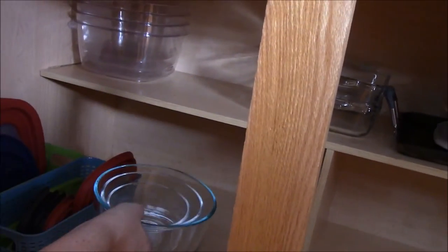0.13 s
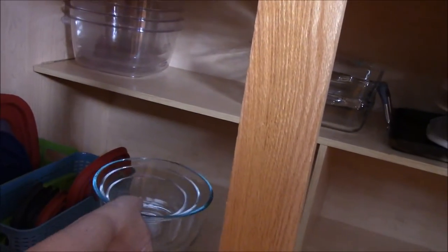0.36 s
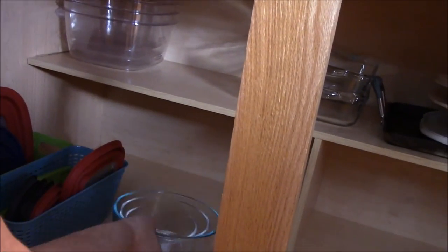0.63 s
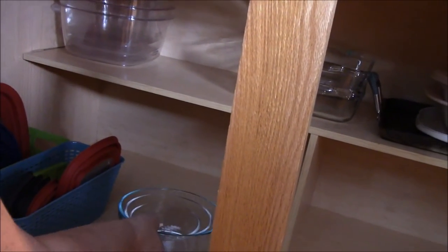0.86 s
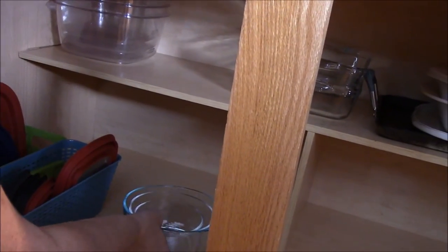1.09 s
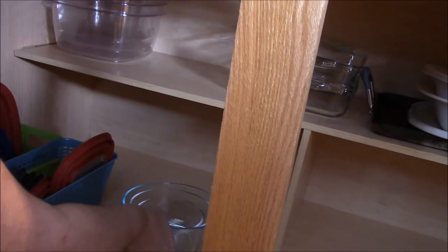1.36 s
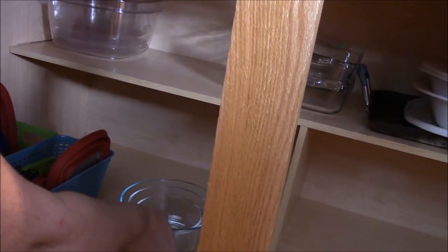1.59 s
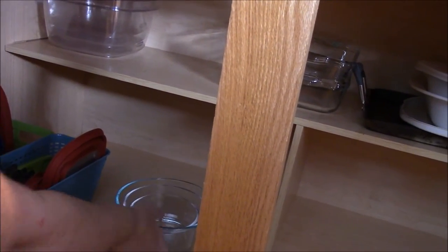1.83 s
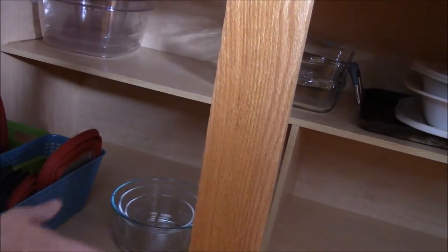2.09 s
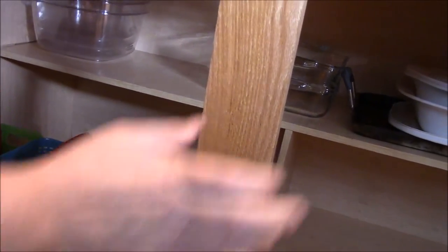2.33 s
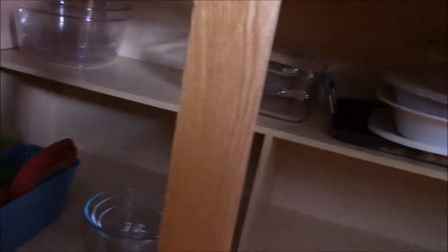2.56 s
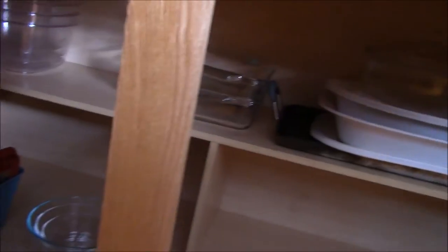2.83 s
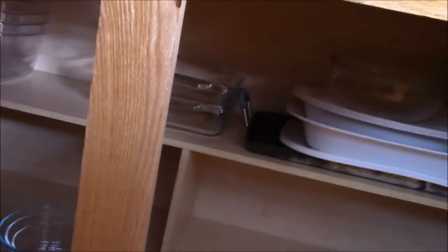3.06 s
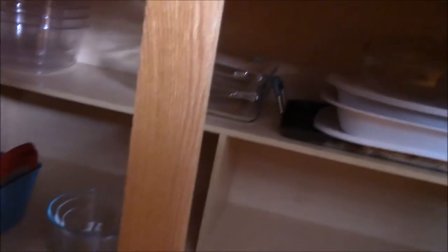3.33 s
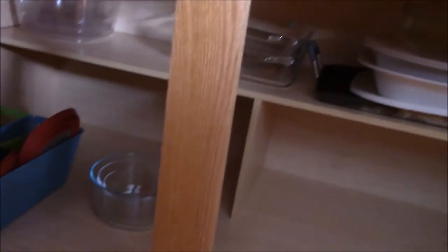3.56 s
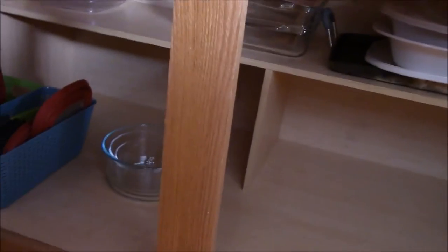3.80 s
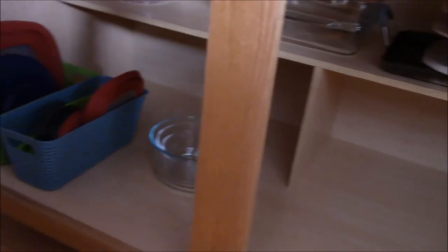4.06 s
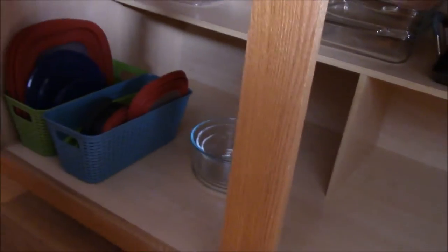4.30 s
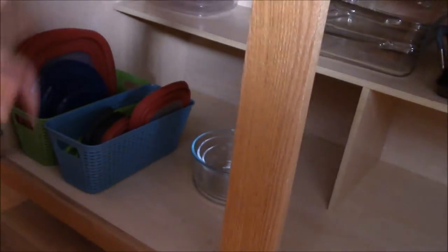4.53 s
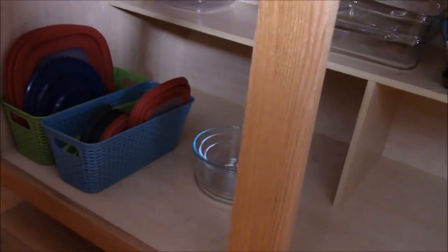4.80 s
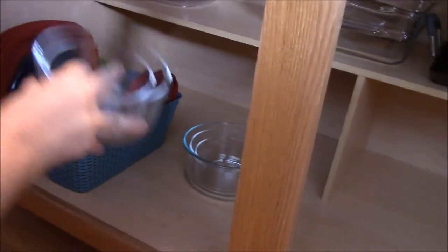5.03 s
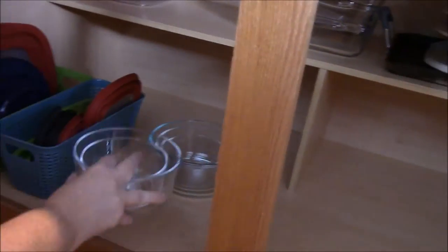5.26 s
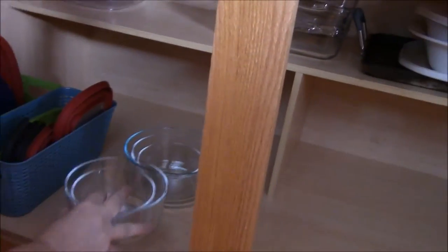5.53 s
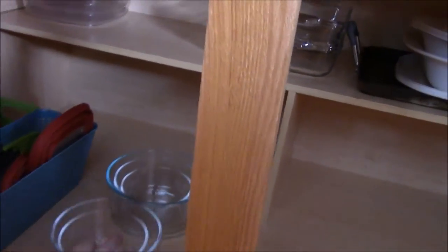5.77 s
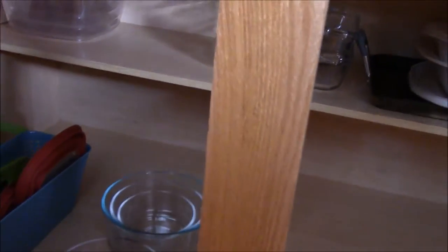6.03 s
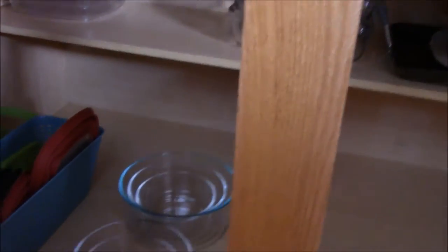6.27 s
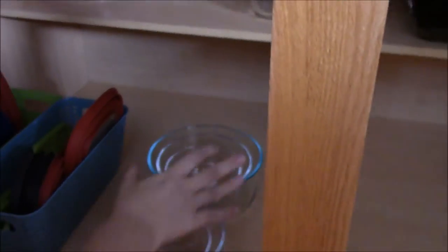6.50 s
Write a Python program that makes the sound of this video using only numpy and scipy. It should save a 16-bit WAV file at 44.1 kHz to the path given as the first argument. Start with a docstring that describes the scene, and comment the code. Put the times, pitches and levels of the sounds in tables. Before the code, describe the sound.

Faint room murmur and soft skin and cloth rustle surround glass bowls handled inside a wooden cupboard. A firm woody thunk comes first, then lighter knocks and nail ticks. A glassy clink starts a short, uneven drag across the shelf, ending in a bump. After a lull, a crisp tick precedes the strongest landing, sharp and glassy with a brief boxy ring. Close microphone, nearly mono, small dry room.

```python
"""Nested glass bowls are set down, pushed and dragged on a wooden cabinet shelf in a quiet kitchen.
Each landing excites decaying modes of the shelf; clinks and jolts ring the bowls' own modes, and heavy
blows make the cabinet boom. The drag is a dense train of stick-slip grains driving shelf and glass.
Sleeves and hands rustle as filtered noise over a murmur of air; a faint, thin tone near 5.6 kHz flickers.
Two close microphones hear nearly the same: a strong mid signal and a weak side signal."""
import sys
import numpy as np
from scipy import signal
from scipy.fft import rfft, irfft
from scipy.io import wavfile
from scipy.ndimage import map_coordinates

SR = 44100
rng = np.random.default_rng(int(sys.argv[2]) if len(sys.argv) > 2 else 0)


def elevation(decibels):
    """Turn decibel levels (scalar or array-like) into linear amplitude ratios."""
    levels = np.asarray(decibels, float)
    return 10 ** (levels / 20)


def generate_wav(sig):
    """Save sig (samples, or channels by samples) to the path in sys.argv[1] as 16-bit PCM at SR."""
    pcm = np.round(np.clip(np.atleast_2d(sig).T, -1, 1) * 32767).astype(np.int16)
    wavfile.write(sys.argv[1], SR, pcm)


N = 292383   # length in samples

# Cloth and skin, before and after the drag: t/s, level/dB of 2.5-8 kHz, level/dB of 8-15.5 kHz
RUSTLE_LEVELS = [
    [(0.0, -71, -85), (0.63, -75.5, -83.5), (1.14, -72.5, -84), (1.76, -73, -87), (2.15, -63.5, -81),
     (2.5, -68, -82.5), (2.65, -66, -78), (2.84, -61.5, -84), (3.0, -67.5, -74), (3.28, -67, -68),
     (3.54, -66.5, -74)],
    [(4.55, -68, -79), (5.11, -68, -76.5), (5.32, -61, -71), (5.56, -67.5, -74), (5.74, -71, -76),
     (6.04, -71.5, -82), (6.18, -63.5, -76), (6.41, -71, -75), (6.63, -70.5, -85)],
]
# Spectral shape of the room's air: f/Hz, relative level/dB per Hz
AIR_SPECTRUM = [(24, -43), (40, -10), (96, -15), (140, -13), (171, -7.5), (209, -3.5), (371, -5),
                (431, -10), (596, -11), (1010, -18.5), (1200, -37), (3190, -40), (5670, -33.5), (6110, -59),
                (15800, -59)]
# Course of the thin tone, about which it flickers: t/s, level/dB
THIN_TONE_LEVELS = [(0, -89), (1.25, -86), (1.38, -74), (1.55, -91), (1.8, -76), (2.0, -86.5), (6.63, -85)]
# Glass landing on the shelf: t/s, relative level/dB at 650 Hz, tilt/(dB per octave),
# fall-off to both sides/(dB per octave squared)
LANDINGS = [(1.006, -16, -2.5, 3.5), (1.011, -22.5, -3, 1), (1.014, -22.5, -2, 4), (1.224, -57, 3.5, -0.2),
            (1.251, -53, 3.5, 2.5), (1.567, -30.5, 0, -0.7), (1.577, -31, -4.5, -1),
            (1.593, -31.5, -6.5, 1.5), (1.665, -45, -1, -0.3), (1.836, -50, 3, 10), (1.845, -44, 1, 7),
            (1.858, -27.5, 2, 12), (1.867, -34, -1, 3), (1.952, -44.5, 4, 4.5), (2.39, -53.5, -1.5, 1.5),
            (2.958, -45, 4, 2.5), (3.234, -38.5, 4.5, 7), (3.555, -39.5, 18, 6.5), (4.202, -25, 0.5, 2.5),
            (4.228, -27.5, 1, 2.5), (5.252, -40.5, 0.5, 3.5), (6.009, -11, 0, 6.5),
            (6.012, -17.5, 0.5, 2.5), (6.04, -23, 0, 2.5), (6.053, -24.5, -2.5, 3.5),
            (6.136, -40, 9.5, 6.5), (6.31, -41.5, 0, 5), (6.397, -59, -7, -0.3)]
# Modes of the shelf: f/Hz, relative level/dB, t60/s
SHELF_MODES = [(190.4, 9.5, 0.087), (224.5, 4.5, 0.19), (254.4, 1, 0.28), (345, 0, 0.17), (395, 2, 0.24),
               (430, -11, 0.12), (448.4, -3, 0.19), (599, 3.5, 0.11), (638, -3.5, 0.18), (727, 2.5, 0.13),
               (905.5, 5.5, 0.083), (1044, -2, 0.12), (1133, 3, 0.05), (1306, -1, 0.11), (1490, 0.5, 0.13),
               (1547, -2.5, 0.15), (1780, -15, 0.076), (1800, 0, 0.099), (1980, -6, 0.087),
               (2053, 3.5, 0.081), (2252, 6.5, 0.069), (2300, -4, 0.11), (2470, -3, 0.078),
               (2665, -15, 0.12)]
# Centres of the frequency zones in which a landing is weighted: f/Hz
SHELF_ZONES = [215, 390, 650, 1170, 2200]
# Glass clinks, and jolts of the dragged bowl that sound its base tones: t/s, relative level/dB,
# share of the wide bowl (0-1), base tones' level/dB, crack's relative level/dB
CLINKS_AND_JOLTS = [(1.0104, -40.5, 0.07, -28, -35), (1.2234, -63.5, 0.6, -69, -56.5),
                    (1.239, -58, 0.6, -54, -45), (1.568, -42.5, 0.65, -50, -35),
                    (1.5848, -48, 0, -45, -34.5), (1.6636, -55.5, 0.65, -65, -50),
                    (1.8635, -61, 0, -35.5, -52), (3.5564, -30.5, 0.8, -22.5, -38),
                    (3.607, -40, 0.55, -29.5, -58), (3.6993, -56, 0.7, -31.5, -62),
                    (3.8003, -41.5, 0.46, -30, -40), (3.8392, -51.5, 0.2, -33.5, -46),
                    (4.032, -47.5, 0.2, -30.5, -63), (4.09, -69, 0.3, -37, -66),
                    (4.2038, -49, 0.1, -26, -60), (4.2194, -47, 0.1, -27.5, -60),
                    (4.2903, -66, 0.2, -38, -50), (5.4019, -50, 0.15, -32.5, -43.5),
                    (6.0132, -21.5, 0, -17, -24.5), (6.0301, -50, 0.3, -22, -28),
                    (6.0416, -39, 0.13, -40, -39), (6.137, -49.5, 0.22, -33.5, -50),
                    (6.2857, -55.5, 0.32, -31.5, -53)]
# Modes of the small bowl: f/Hz, relative level/dB, t60/s
SMALL_BOWL_MODES = [(2676, -8.5, 0.16), (3828, -7, 0.22), (3850, -5.5, 0.079), (4710, -28, 0.033),
                    (5560, -14.5, 0.066), (5819, -24, 0.088), (6400, -20, 0.15), (6500, -5, 0.068),
                    (6700, -22, 0.089), (8900, -19, 0.067), (9250, -26, 0.059), (11930, -29, 0.067)]
# Modes of the wide bowl: f/Hz, relative level/dB, t60/s
WIDE_BOWL_MODES = [(1965, -13, 0.25), (2340, -6, 0.34), (3020, -14.5, .15), (3298, -6.5, 0.23),
                   (3290, 1.5, 0.096), (4004, 0.5, 0.18), (5690, -14, 0.27), (5900, -19, .2),
                   (9020, -26, 0.17)]
# Modes of the bowl bottoms: f/Hz, relative level/dB, t60/s
BASE_MODES = [(906, -11, 0.098), (1066, -1, 0.053), (1193.6, 0, 0.076), (1225, -9, 0.11), (1293, -2, 0.035),
              (1534, -8.5, 0.1), (1800, -11.5, 0.06)]
# Blows that make the cabinet boom: t/s, level/dB
BOOMS = [(1.012, -26.5), (1.335, -48), (1.583, -28.5), (1.869, -48), (3.699, -57), (3.799, -62.5),
         (4.049, -53), (4.209, -46.5), (4.377, -52.5), (6.015, -28), (6.292, -50)]
# Modes of the cabinet: f/Hz, relative level/dB, t60/s
CABINET_MODES = [(110.9, -5.5, 0.23), (127.6, 0.5, 0.19)]
# Reverberation of the kitchen: f/Hz, t60/s
KITCHEN_DECAY = [(100, 0.63), (400, 0.63), (1500, 0.53), (5000, 0.25), (12000, 0.61)]
# Fingernail and rim ticks: t/s, level/dB, f/Hz of the first ring, f/Hz of the second,
# level/dB of the second against the first
TICKS = [(1.774, -42, 4800, 3020, -3), (1.903, -51, 3200, 2600, -2), (2.254, -53.5, 10000, 7000, 3),
         (2.391, -40, 3020, 2300, -7), (3.235, -45.5, 5430, 1800, 10), (4.317, -40, 4700, 6900, -10),
         (5.250, -40, 5260, 1630, 5), (5.259, -39, 5050, 3740, -3.5), (5.417, -58, 7500, 3900, 6),
         (5.631, -48, 3020, 2200, 3), (5.767, -29, 4140, 2460, 0.5), (5.771, -32.5, 1490, 2740, 0)]
# The drag, four shoves: t/s, level/dB of the middle band, level/dB of the low band against it
DRAG_LEVELS = [(3.56, -38, -15), (3.664, -33.5, -6), (3.738, -36.5, -7.5), (3.79, -25.5, -2),
               (3.868, -32.5, -4), (3.906, -43, 1), (4.016, -29.5, -6), (4.142, -40.5, -7.5),
               (4.2, -35, 1.5), (4.284, -42.5, 5), (4.394, -50, 10), (4.6, -70, -25)]
# Resonances that sing under the drag: f/Hz, bandwidth/Hz, relative level/dB
RUB_RESONANCES = [(390, 13, -30), (492, 20, -3), (905.5, 11, 3.5), (1000, 38, 0.5), (1176, 28, 3),
                  (1298, 14, -3.5), (1733, 210, 1.5), (2190, 180, 4.5), (2453, 43, 0), (2750, 36, -22),
                  (3036, 21, -12.5)]
# Gain of the side signal: f/Hz, level/dB
SIDE_GAIN = [(60, -17), (150, -24.5), (380, -19.5), (950, -16), (2380, -16), (5980, -18), (15000, -17)]


def rms_one(x):
    """Normalization: division by the root mean square gives unit power."""
    return x / np.sqrt(np.mean(x ** 2) + 1e-20)


def in_time(rows):
    """Linear interpolation: each column becomes a piecewise straight curve in time."""
    times, *columns = np.transpose(rows)
    return [np.interp(np.arange(N) / SR, times, column) for column in columns]


def at_hz(points, hz):
    """Interpolation on a logarithmic frequency axis."""
    table_hz, values = np.array(points)[:, :2].T
    return np.interp(np.log(hz), np.log(table_hz), values)


def band(x, low_hz, high_hz, order=2):
    """Band limitation by a Butterworth filter."""
    edges = [low_hz, min(high_hz, .45 * SR)]
    return signal.sosfilt(signal.butter(order, edges, "band", fs=SR, output="sos"), x)


def drift(rate):
    """Slow random modulation: a spline through `rate` normal deviates a second, spread about 1."""
    steps = rng.standard_normal(int(N / SR * rate) + 3)
    return map_coordinates(steps, [np.arange(N) / SR * rate], order=3)


def ring(x, hz, t60):
    """Damped resonance: a unit click sets a decaying sine of height 1 ringing."""
    radius = 1000 ** (-1 / (t60 * SR))
    angle = 2 * np.pi * hz / SR
    return signal.lfilter([0, np.sin(angle)], [1, -2 * radius * np.cos(angle), radius ** 2], x + 1e-18)


def soft_ring(x, hz, t60, cycles):
    """Finite contact time: a contact of a few cycles makes the mode swell in instead of clicking."""
    contact_t60 = cycles / hz
    scale = 2 * (1 - 1000 ** (-1 / (contact_t60 * SR)))
    return ring(ring(x, hz, contact_t60), hz, t60) * scale


def strike(rows, gains):
    """Impulsive excitation: one click of the given gain at the time of each row."""
    clicks = np.zeros(N)
    np.add.at(clicks, (np.array(rows)[:, 0] * SR).astype(int), gains)
    return clicks


def dying_noise(rows, gains, t60):
    """High modal density: unresolved modes act as noise that starts at each row and decays."""
    radius = 1000 ** (-1 / (t60 * SR))
    envelope = signal.lfilter([1], [1, -radius], strike(rows, gains) + 1e-18)
    return envelope * rng.standard_normal(N)


def rustle(patchy_db=0.88, soft_mean_db=-64.5, soft_follows=0.88):
    """Friction noise of cloth and skin: three bands of slightly patchy noise, in mid and side."""
    middle, crisp = in_time(np.vstack(RUSTLE_LEVELS))
    soft = soft_mean_db + soft_follows * (middle - middle.mean())   # follows a share of the swing
    out = 0
    for level_db, low_hz, high_hz in ((soft, 600, 2500), (middle, 2500, 8000), (crisp, 8000, 15500)):
        noise = rms_one(band(rng.standard_normal((2, N)), low_hz, high_hz))
        out = out + elevation(level_db + patchy_db * drift(14.0)) * noise
    return out


def air(murmur_db=-60.0):
    """Stationary noise: spectral shaping of random noise gives a steady murmur in mid and side."""
    hz = np.maximum(np.fft.rfftfreq(N, 1 / SR), 10)
    murmur = irfft(rfft(rng.standard_normal((2, N))) * elevation(at_hz(AIR_SPECTRUM, hz)), N)
    return elevation(murmur_db) * rms_one(murmur)


def thin_tone(hz=5570, flicker_db=3.3):
    """Amplitude modulation: a faint sine, in mid only, flickers at random in level."""
    level = elevation(in_time(THIN_TONE_LEVELS)[0] + flicker_db * drift(7.9))
    tone = level * np.sin(2 * np.pi * hz * np.arange(N) / SR)
    return tone * [[1], [0]]


def landings(level_db=-12.0, scatter_db=2.5, body_db=-7.0, body_cycles=11.0, body_t60=0.073):
    """Modal excitation: each landing rings the shelf modes by zone, and dense modes as dying noise."""
    rows, shelf, zones_hz = np.array(LANDINGS), np.array(SHELF_MODES), np.array(SHELF_ZONES)
    octaves = np.log2(zones_hz / zones_hz[2])
    zones_db = rows[:, [1]] + rows[:, [2]] * octaves - rows[:, [3]] * octaves ** 2
    zone_of = np.argmin(abs(np.log(shelf[:, [0]] / zones_hz)), axis=1)   # nearest zone of each mode
    luck = rng.standard_normal((len(rows), len(shelf)))
    signs = rng.choice([-1, 1], (len(rows), len(shelf)))
    out = np.zeros(N)
    for k, (hz, mode_db, t60) in enumerate(shelf):
        strength = elevation(zones_db[:, zone_of[k]] + mode_db + level_db + scatter_db * luck[:, k])
        out += soft_ring(strike(rows, strength * signs[:, k]), hz, t60, cycles=4.1)
    for k, hz in enumerate(zones_hz):
        zone_t60 = body_t60 + body_cycles / hz   # lows last longer
        dense = dying_noise(rows, elevation(zones_db[:, k] + body_db), zone_t60)
        out += band(dense, hz / 1.225, hz * 1.433) * np.sqrt(SR / hz / 2)
    return out


def bowls(rubbing, scatter_db=2.0, cycles=17.0, held_ring=0.39, rub_tilt_db=9.0, rub_flicker_db=3.8):
    """Modal ringing and damping: clinks, jolts and rubbing excite glass; a holding hand shortens it."""
    let_go_s = 2.2   # until then a hand holds the stack
    held_tilt_db = 8.5   # colour of a hit in the hand, dB per octave about 3800 Hz
    rows = np.array(CLINKS_AND_JOLTS)
    times, wide = rows[:, 0], np.clip(rows[:, 2], 0, 1)
    held = np.arange(N) < let_go_s * SR
    # the crack: too many modes to tell apart
    out = band(dying_noise(rows, elevation(rows[:, 4] - 7.0), 0.053), 2700, 8700)
    # modes, share of each hit, level/dB of the rubbing, tilt when free/(dB per octave)
    small_bowl = (SMALL_BOWL_MODES, 1 - wide, -32, 1.5)
    wide_bowl = (WIDE_BOWL_MODES, wide, -30, -4)
    for modes, share, rubbed_db, free_tilt_db in (small_bowl, wide_bowl):
        tilt_db = np.where(times < let_go_s, held_tilt_db, free_tilt_db)
        luck = rng.standard_normal((len(rows), len(modes)))
        for k, (hz, mode_db, t60) in enumerate(modes):
            octaves = np.log2(hz / 3800)
            hit_db = rows[:, 1] + tilt_db * octaves + scatter_db * luck[:, k]
            hits = strike(rows, share * elevation(hit_db))
            # the rubbed ring comes and goes
            rub_db = rubbed_db + rub_tilt_db * octaves + rub_flicker_db * drift(18.0)
            hits += elevation(rub_db) * rubbing
            free_sound = soft_ring(hits * ~held, hz, t60, cycles)
            held_sound = soft_ring(hits * held, hz, held_ring * t60, cycles)
            out += elevation(mode_db) * (free_sound + held_sound)
    for hz, mode_db, t60 in BASE_MODES:
        hits = strike(rows, elevation(rows[:, 3] + mode_db))
        out += soft_ring(hits * ~held, hz, t60, 9.9)
        out += soft_ring(hits * held, hz, held_ring * t60, 4.0)
    return out


def booms():
    """Low-order modes: the whole cabinet answers heavy blows with two low, slow-starting tones."""
    blows = strike(BOOMS, elevation(np.array(BOOMS)[:, 1]))
    return sum(elevation(mode_db) * soft_ring(blows, hz, t60, cycles=2.7) for hz, mode_db, t60 in CABINET_MODES)


def kitchen(x, gap_s=0.013):
    """Diffuse reverberation: two uncorrelated tails, each octave decaying at its own rate."""
    t, tails = np.arange(SR) / SR, 0
    for hz in 90 * 2 ** np.arange(8):
        noise = band(rng.standard_normal((2, SR)), hz / np.sqrt(2), hz * np.sqrt(2))
        decay = 1000 ** (-t / at_hz(KITCHEN_DECAY, hz))
        tails = tails + noise * decay * (t > gap_s)
    tails /= np.sqrt(np.sum(tails ** 2, axis=1, keepdims=True))   # unit energy
    return signal.fftconvolve(x[None], tails, axes=1)[:, :N]


def ticks(t60=0.0068, snap_db=-13.5, snap_t60=0.0045):
    """Heavily damped resonance: two very short rings over a broadband snap."""
    rows = np.array(TICKS)
    out = band(dying_noise(rows, elevation(rows[:, 1] + snap_db), snap_t60), 1500, 7800)
    click = signal.unit_impulse(1500)
    for s, level_db, hz, other_hz, other_db in TICKS:
        first = soft_ring(click, hz, t60, 2.9)
        second = elevation(other_db) * soft_ring(click, other_hz, t60, 10.0)
        at = int(s * SR)
        out[at:at + len(click)] += elevation(level_db) * (first + second)
    return out


def drag(per_s=2500.0, size_db=2.0, judder_db=2.5, sing_db=6.0, shift_db=3.5):
    """Stick-slip friction: grains drive wandering resonances; returns shelf sound and push on glass."""
    # level/dB against the middle band, and share of its swing that each follows
    bright_mean_db, bright_follows = -10, 1
    glass_mean_db, glass_follows = -31, 0.53
    level_db, weight_db = in_time(DRAG_LEVELS)
    swing_db = level_db - np.mean(DRAG_LEVELS, axis=0)[1]
    bright_db = bright_mean_db + (bright_follows - 1) * swing_db
    glass_db = glass_mean_db + (glass_follows - 1) * swing_db
    t = np.arange(N) / SR
    moving = (t > DRAG_LEVELS[0][0]) & (t < DRAG_LEVELS[-1][0])
    sizes = elevation(size_db * np.minimum(rng.exponential(1, N), 5)) * rng.choice([-1, 1], N)
    slips = rng.random(N) < per_s / SR
    grains = rms_one(sizes * slips) * elevation(judder_db * drift(35.0))
    sung = np.zeros(N)
    for hz, width, db in RUB_RESONANCES:
        favoured = grains * elevation(shift_db * drift(9.0))   # now one resonance, now another
        t60 = np.log(1000) / np.pi / width
        sung += elevation(db) * ring(favoured, hz, t60) * np.sqrt(width)
    rubbed = elevation(sing_db) * rms_one(sung) + rms_one(band(grains, 420, 2400, order=1))
    middle = rms_one(band(rubbed, 506, 1717, order=3))
    low = elevation(weight_db) * rms_one(band(rubbed, 285, 775))
    bright = elevation(bright_db) * rms_one(band(rubbed, 1810, 3230))
    scrape = moving * elevation(level_db) * (middle + low + bright)
    rubbing = moving * elevation(level_db + glass_db) * grains
    return scrape, rubbing


def scene():
    """Superposition in mid and side; the side is weak, as the microphones sit close together."""
    background = rustle() + air() + thin_tone()
    scrape, rubbing = drag()
    near = landings() + bowls(rubbing) + booms() + ticks() + scrape   # all within arm's reach
    # cabinet walls reach the two ports a little differently
    smear = np.diff(rms_one(rng.standard_normal(size=200)))
    direct = np.array([near, elevation(-17.5) * signal.fftconvolve(near, smear)[:N]])
    mid, side = direct + elevation(-15.5) * kitchen(near) + background * elevation([[0], [6.0]])
    hz = np.maximum(np.fft.rfftfreq(N, 1 / SR), 10)
    side = irfft(rfft(side) * elevation(at_hz(SIDE_GAIN, hz)), N)
    return np.array([mid + side, mid - side])


def band_limit(x):
    """A steep low-pass at the top of the band."""
    return signal.sosfilt(signal.butter(12, 16390, fs=SR, output="sos"), x)


def record(dry):
    """Band limitation: the microphones drop the deep bass and the very top."""
    low_cut = signal.butter(3, 79, "high", fs=SR, output="sos")
    top_cut = signal.cheby2(10, 50, 15700 * 1.04, fs=SR, output="sos")   # 50 dB down from this edge
    heard = signal.sosfilt(top_cut, signal.sosfilt(low_cut, dry))
    return band_limit(heard)


dry = scene()
out = record(dry)
generate_wav(out)
```